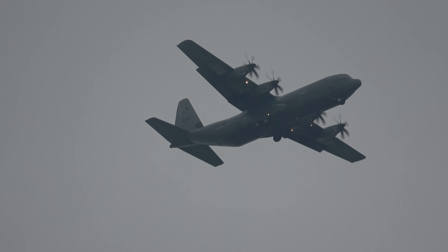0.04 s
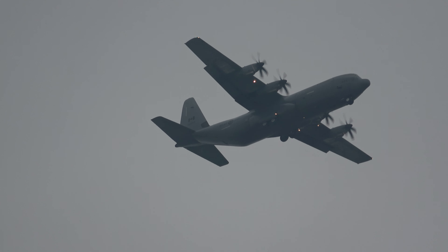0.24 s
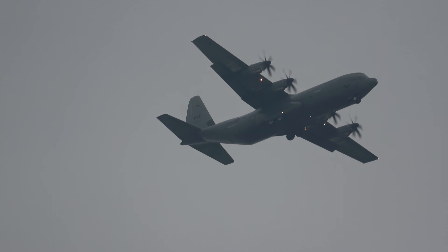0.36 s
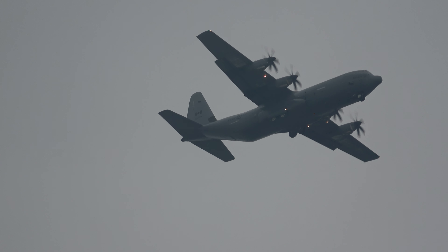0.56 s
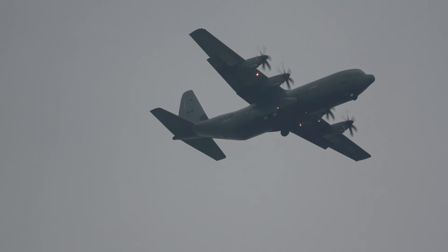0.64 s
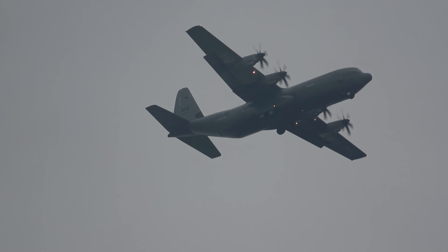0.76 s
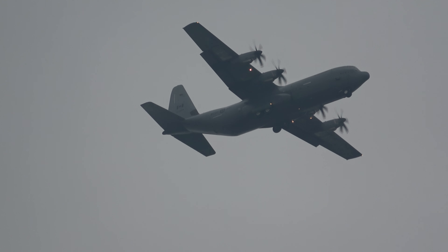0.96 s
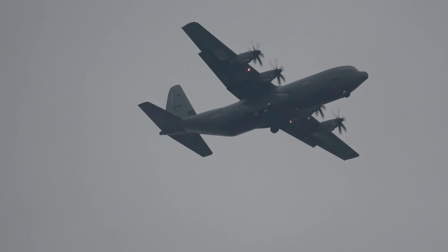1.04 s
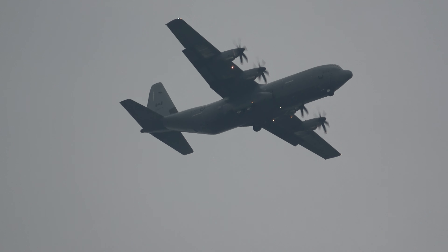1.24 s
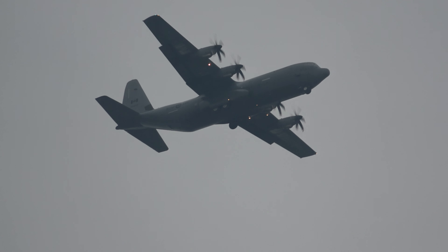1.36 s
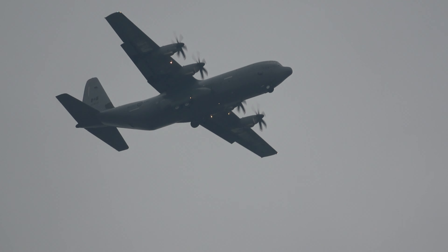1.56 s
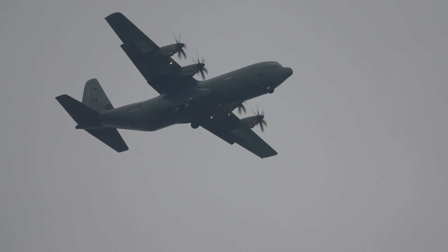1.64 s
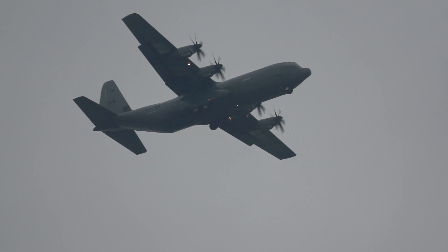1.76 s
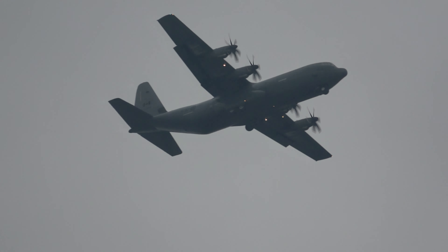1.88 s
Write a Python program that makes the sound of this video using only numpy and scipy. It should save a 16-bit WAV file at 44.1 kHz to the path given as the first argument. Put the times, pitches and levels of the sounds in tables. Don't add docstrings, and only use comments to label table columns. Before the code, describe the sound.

Deep propeller drone of a turboprop plane passing overhead, its muffled roar swelling and fading.

```python
import sys
import numpy as np
from scipy import signal
from scipy.fft import rfft, irfft
from scipy.io import wavfile

SR = 44100
rng = np.random.default_rng(int(sys.argv[2]) if len(sys.argv) > 2 else 0)


def ratio(d):
    e = np.asarray(d, float) / 20
    return 10 ** e


def transcribe(u):
    v = np.clip(np.atleast_2d(u).T, -1, 1)
    q = np.round(v * 32767).astype(np.int16)
    wavfile.write(sys.argv[1], SR, q)


N = 150381

# f/Hz, density level/dB
HISS_SPECTRUM = [(3000, 0), (4500, -1.5), (6500, 0.5), (9000, -3.5), (13000, -5), (15500, -9)]
# f/Hz, share/1
HISS_LIKENESS = [(4500, 1), (5200, 0.44), (6200, .15), (10000, .35), (13500, .7), (15500, .92)]
# t/s, level/dB, centre f/Hz, length/s, ringing share/1
CLOTH_RUSTLES = [(.745, -79.5, 4100, .012, 1.5), (1.629, -63, 5900, .004, .5), (1.816, -71, 5960, .003, .3),
                 (1.836, -69, 5000, .003, .2), (2.042, -72, 5120, .004, .8),
                 (2.127, -67.5, 5000, .007, 1.3), (2.251, -68, 6000, .004, 1.7),
                 (2.263, -71, 5600, .055, .4), (2.331, -63, 5700, .022, .2), (2.36, -70, 5040, .07, .3),
                 (2.533, -62, 6350, .014, 1.1), (2.537, -62, 5140, .016, 1.2),
                 (2.56, -70.5, 5700, .055, 0.35)]
# t/s, f/Hz, level/dB
BIRD_NOTE = [
    (1.12, 8210, -95),
    (1.14, 8190, -80),
    (1.34, 8010, -81),
    (1.4, 7960, -84),
    (1.43, 7910, -76),
    (1.62, 7740, -77),
    (1.86, 7670, -82),
    (1.99, 7670, -85),
    (2.02, 7670, -97),
]
# t/s, level/dB, extra treble/dB
ROAR_SWELL = [(0, -29.5, 1.5), (.14, -31, 2.2), (.3, -27, -0.5), (.52, -28.5, 1), (.75, -22, -0.5),
              (.95, -23.5, -1.6), (1.19, -25, -2), (1.3, -27.5, 0.4), (1.45, -25, -0.7), (1.65, -28.5, 2.5),
              (1.97, -23, -1.1), (2.2, -27.5, 3.5), (2.45, -27, 1), (2.6, -26.5, 0.2), (2.9, -25.5, -0.5),
              (3.05, -27.5, 2.5), (3.3, -23, 3), (3.41, -24.5, .6)]
# f/Hz, density level/dB
ROAR_SPECTRUM = [(28, -22), (55, -7), (90, 0), (180, -4), (260, -2), (430, -3), (1500, -22), (3000, -35.5)]
# f/Hz, width/Hz, boost/dB
GROUND_HUMPS = [(84, 11, 4), (129, 32, 6), (230, 40, 2), (272.8, 14, 5), (488.4, 32, -10), (563, 18, 2.5),
                (630, 35, -5.5), (741, 71, 5.5), (1022.5, 61, 9), (1270, 70, 5), (1880, 810, 5.5),
                (2800, 120, 4.5)]
# t/s, level/dB
WHINE_SWELL = [(0, -38), (.22, -34), (.3, -41), (.42, -46), (.46, -35), (.6, -37), (.8, -31), (.9, -39),
               (1.38, -41), (1.55, -36), (1.8, -43), (1.97, -39), (2.31, -43), (2.39, -35), (2.47, -43),
               (3.11, -42), (3.19, -30.5), (3.41, -41)]
# t/s, level/dB, lean to the left/dB (only its size counts, not its sign)
BLADE_SWELL = [(0, -36, 0), (.14, -25, -0.5), (.5, -23.5, 3), (.8, -18.5, 1.5), (1.0, -23, 2.5),
               (1.3, -24.5, 1), (1.5, -19.5, 0), (1.68, -16.5, 0.8), (1.85, -19, -5.5), (2.05, -18, -4),
               (2.23, -15.5, -0.1), (2.5, -15.5, .5), (2.65, -18.5, 1.3), (2.8, -22, 1.1), (2.92, -20, 0.2),
               (3.05, -13.5, -0.6), (3.25, -14.5, 0), (3.41, -14, 0.3)]
# f/Hz, difference/dB
LEFT_LEAN = [(60, .9), (120, .45), (170, .8), (230, 5.3), (460, 6.3), (640, 3.8), (1200, 3.1), (2400, .9)]

SIDES = np.array([[.5], [-.5]])


def rms_one(x):
    return x / np.sqrt(np.mean(x ** 2) + 1e-20)


def in_time(rows):
    s, *columns = np.transpose(rows)
    return [np.interp(np.arange(N) / SR, s, c) for c in columns]


def at_hz(points, hz):
    table_hz, values = np.array(points).T
    return np.interp(np.log(hz + 1), np.log(table_hz), values)


def colour(x, gain):
    return irfft(rfft(x) * gain(np.fft.rfftfreq(N, 1 / SR)), N)


def drift(rate):
    r = np.exp(-80 * np.pi * rate / SR)
    slow = signal.lfilter([1], [1, -2 * r, r * r], rng.standard_normal(N // 40 + 2002))[2000:]
    return np.interp(np.arange(N) / 40, np.arange(len(slow)), rms_one(slow - slow.mean()))


def bandpass(x, order, low, high):
    return signal.sosfilt(signal.butter(order, [low, high], "band", fs=SR, output="sos"), x)


def doppler_phase(hz):
    sag_per_s = .01013
    t = np.arange(N) / SR
    return 2 * np.pi * hz * (t - sag_per_s * t ** 2 / 2)


def microphone_hiss():
    level_db = -64.5
    mid, side = rng.standard_normal((2, N))
    alike = lambda hz: np.clip(at_hz(HISS_LIKENESS, hz), 0, 1)
    mid = colour(mid, lambda hz: ratio(at_hz(HISS_SPECTRUM, hz)) * np.sqrt(1 + alike(hz)))
    side = colour(side, lambda hz: ratio(at_hz(HISS_SPECTRUM, hz)) * np.sqrt(1 - alike(hz)))
    return ratio(level_db) * rms_one(mid + side * [[1], [-1]])


def rustles():
    relative_width, ring_hz, attack_s, tail_s = 0.19, 200, .0015, .005
    out = np.zeros(N)
    t = np.arange(SR // 8) / SR
    for s, db, hz, length, share in CLOTH_RUSTLES:
        grit = rng.standard_normal(len(t)) * ratio(3.0 * rng.standard_normal(len(t)))
        half_width = relative_width * hz
        broad = rms_one(bandpass(grit, 3, hz - half_width, hz + half_width))
        ringing = rms_one(bandpass(grit, 3, hz - ring_hz, hz + ring_hz))
        shape = np.minimum(t / attack_s, 1) * np.exp(-np.maximum(t - length, 0) / tail_s)
        i = int(s * SR)
        out[i:i + len(t)] += ratio(db) * shape * (broad + share * ringing)
    return out


def bird():
    flutter_db, tremor_hz = 1.5, 12
    hz, db = in_time(BIRD_NOTE)
    t = np.arange(N) / SR
    sings = (t > BIRD_NOTE[0][0]) & (t < BIRD_NOTE[-1][0])
    phase = 2 * np.pi * np.cumsum(hz + tremor_hz * drift(30)) / SR
    return sings * np.sqrt(2) * ratio(db + flutter_db * drift(25)) * np.sin(phase)


def roar():
    patchy_db, shared_db, air_cut_hz = 1.58, -0.13, 2900
    rumble_hz, rumble_follows = 170, 0.64
    level_db, treble_db = in_time(ROAR_SWELL)
    run_in = SR // 2
    white = rng.standard_normal((3, N + run_in))
    together = drift(2.5)
    edges = 22 * 2 ** (np.arange(42) / 5)
    common = 0
    for k, (low, high) in enumerate(zip(edges, edges[1:])):
        band = bandpass(white[k % 2], 2, low, high)[run_in:]
        tilt = np.clip(np.log2(low / 1000), 0, 1) * treble_db
        tilt += (low < rumble_hz) * (rumble_follows - 1) * (level_db - level_db.mean())
        common = common + ratio(shared_db * together + patchy_db * drift(2.2) + tilt) * band

    def path_gain(hz):
        humps = sum(db / (1 + (2 * (hz - at) / width) ** 2) for at, width, db in GROUND_HUMPS)
        return ratio(at_hz(ROAR_SPECTRUM, hz) + humps) / np.sqrt(1 + (hz / air_cut_hz) ** 14)

    out = colour(np.array([common, white[2, run_in:]]), path_gain)
    return ratio(level_db + 2.42) * out / np.std(out, axis=1, keepdims=True)


def turbines():
    whine_hz, wander_rad, twinkle = 1708, 1.5, .38
    phase = doppler_phase(whine_hz) + wander_rad * drift(9)
    whine = (1 + twinkle * drift(22)) * np.sin(phase)
    return ratio(in_time(WHINE_SWELL)[0]) * rms_one(whine)


def propellers():
    blade_hz, wander_rad, flutter_db, overtone_db = 118.5, 0.05, 1.06, -22.5
    phase = doppler_phase(blade_hz) + wander_rad * drift(0.58)
    overtone_gain = ratio(overtone_db - 2.5 + 2.5 * drift(7)) * np.array([[1.3], [.7]])
    tone = np.sin(phase) + overtone_gain * np.sin(2 * phase + drift(3.3))
    level_db, pan_db = in_time(BLADE_SWELL)
    gain_db = level_db + flutter_db * drift(8.2) + np.abs(pan_db) * SIDES
    return np.sqrt(2) * ratio(gain_db) * tone


def scene():
    bird_pan_db, rustle_pan_db, stray_db = 1.5, 3, -23
    near = ratio(SIDES * rustle_pan_db) * rustles() + ratio(SIDES * bird_pan_db) * bird()
    noise, stray = roar()
    aircraft = colour(turbines() + noise, lambda hz: ratio(SIDES * at_hz(LEFT_LEAN, hz))) + propellers()
    return near + aircraft + 2 * SIDES * ratio(stray_db) * stray


def top_cut(x):
    return signal.sosfilt(signal.butter(12, 15750, fs=SR, output="sos"), x)


def record(dry):
    fade_out_s = .002
    fade = np.minimum(np.arange(N, 0, -1) / (fade_out_s * SR) + .2, 1)
    mix = fade * dry + microphone_hiss()
    return top_cut(mix)


dry = scene()
out = record(dry)
transcribe(out)
```